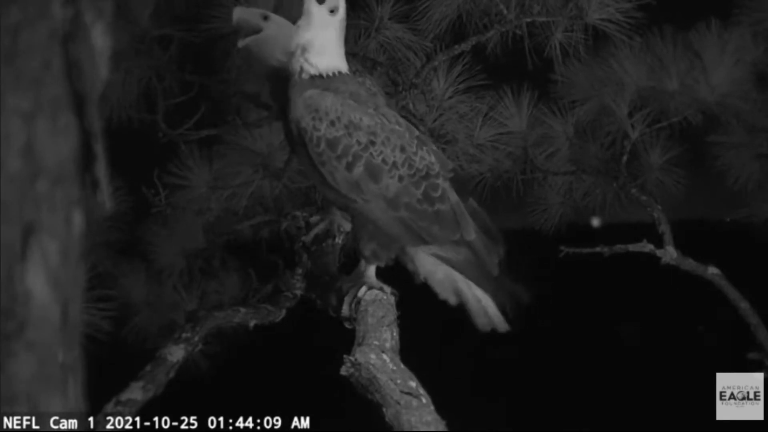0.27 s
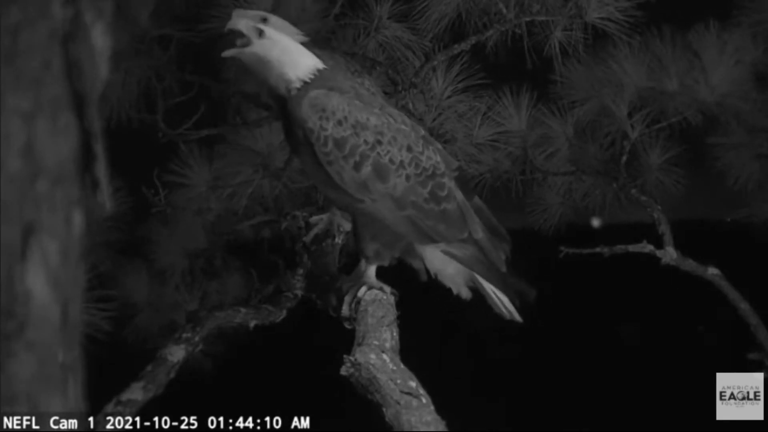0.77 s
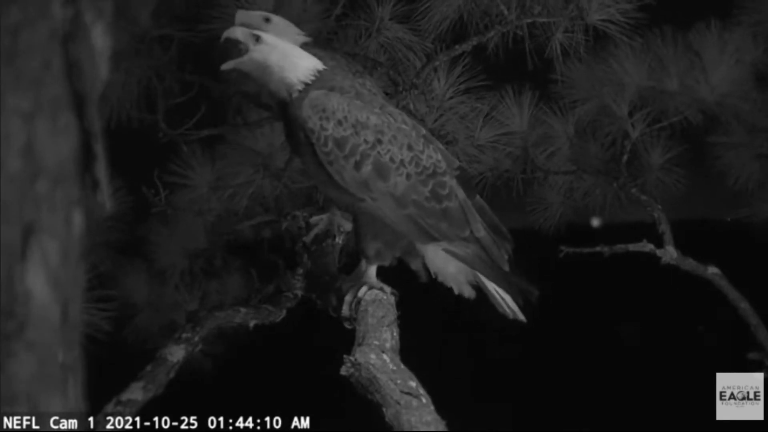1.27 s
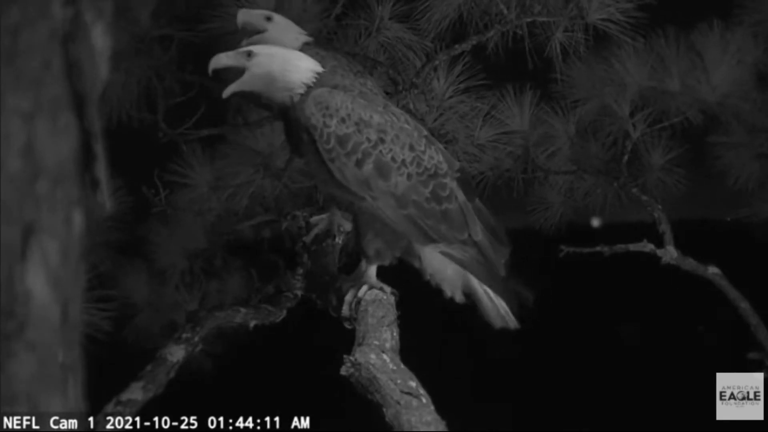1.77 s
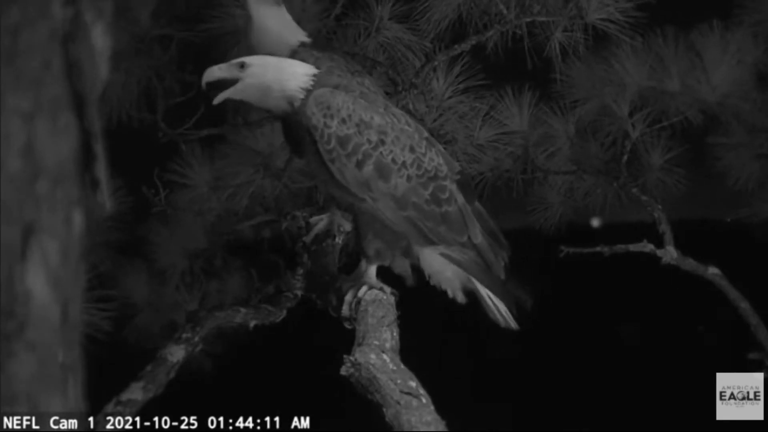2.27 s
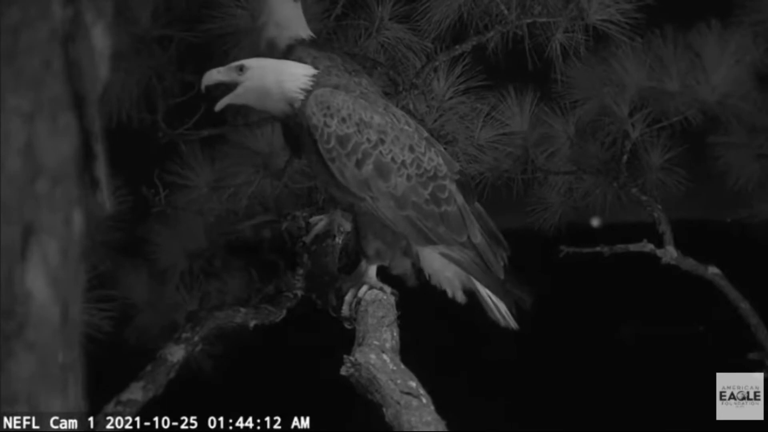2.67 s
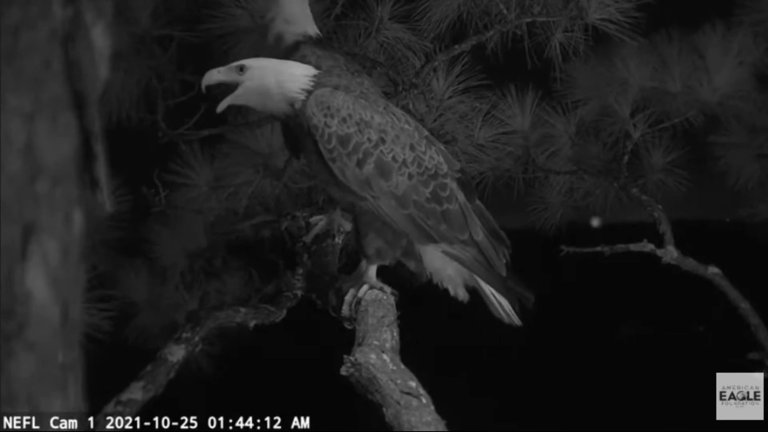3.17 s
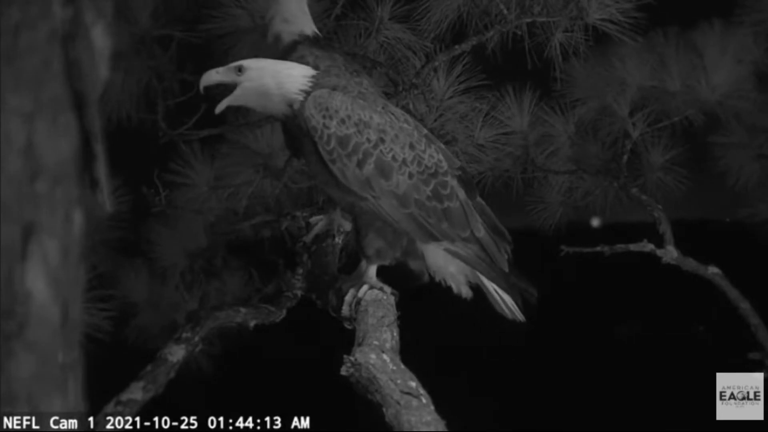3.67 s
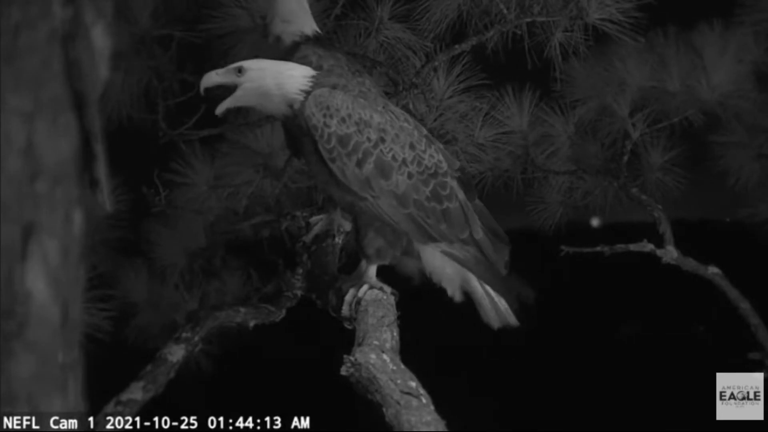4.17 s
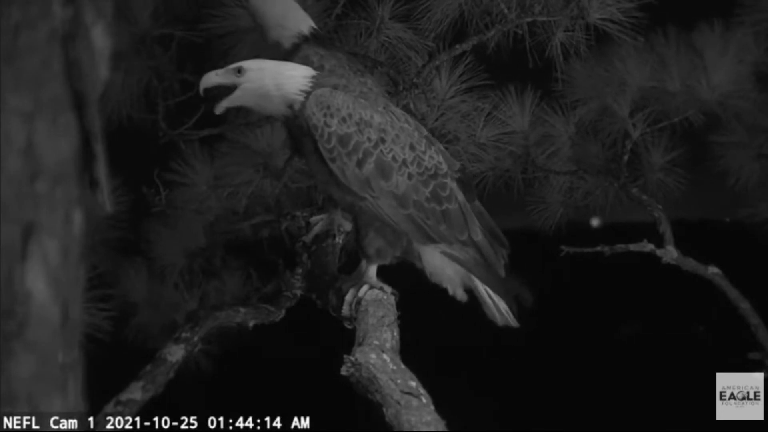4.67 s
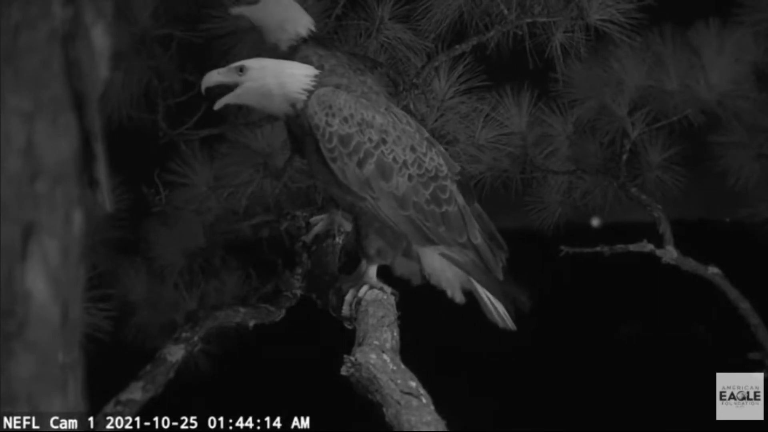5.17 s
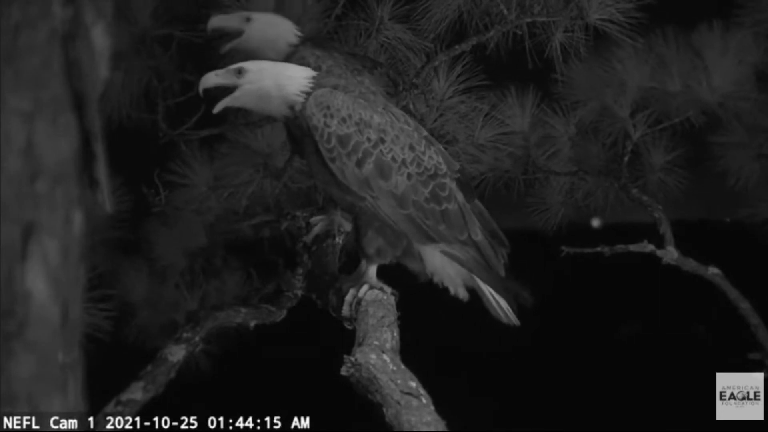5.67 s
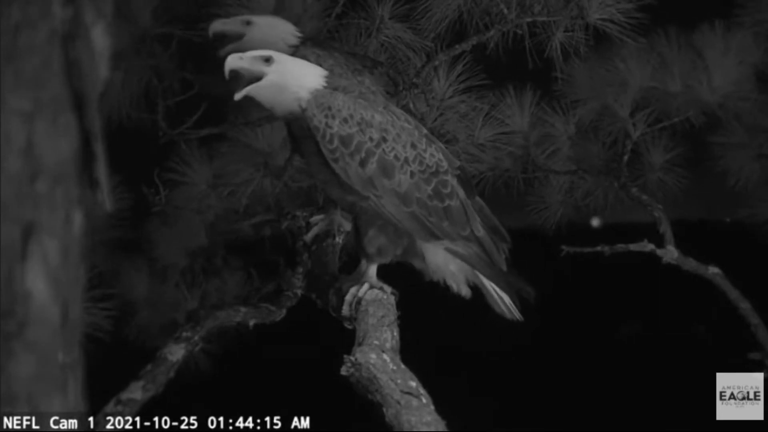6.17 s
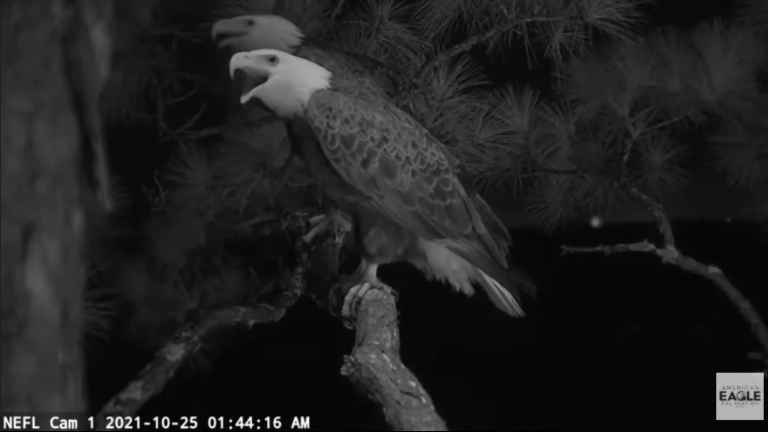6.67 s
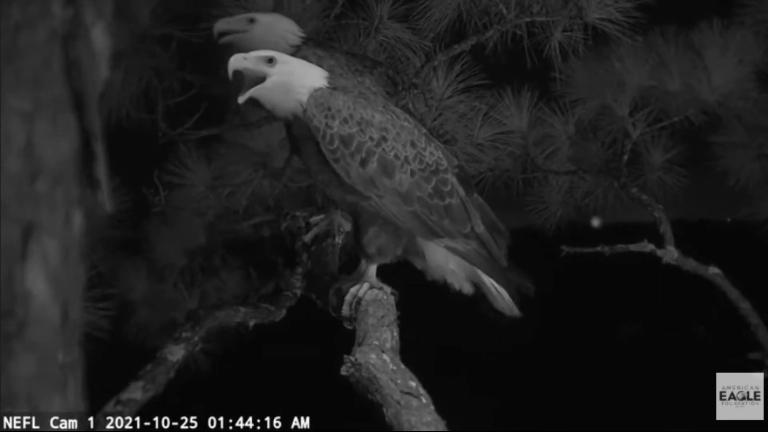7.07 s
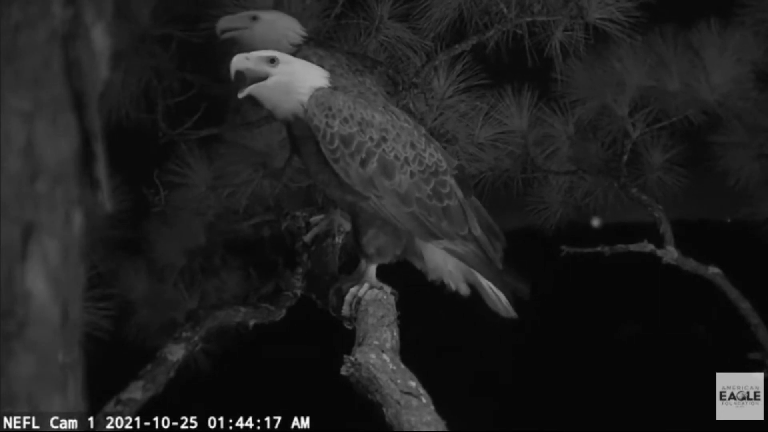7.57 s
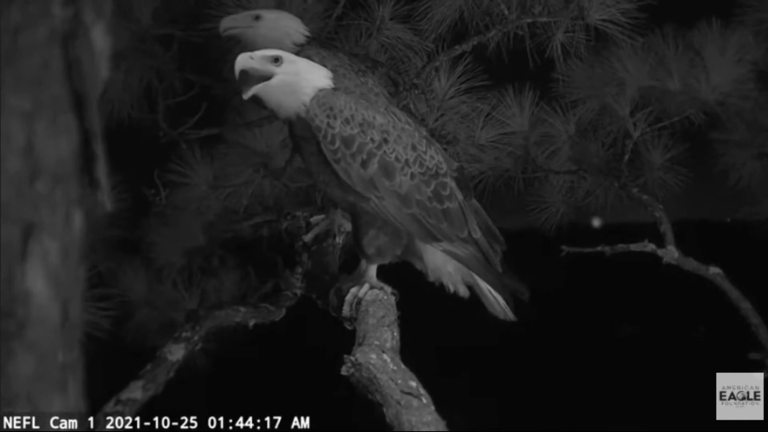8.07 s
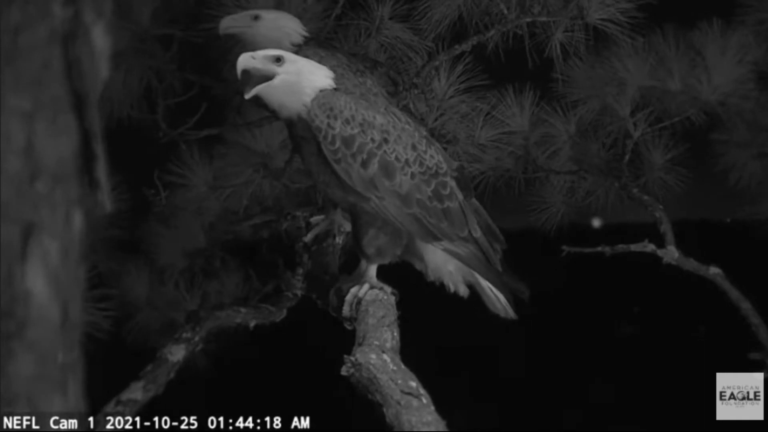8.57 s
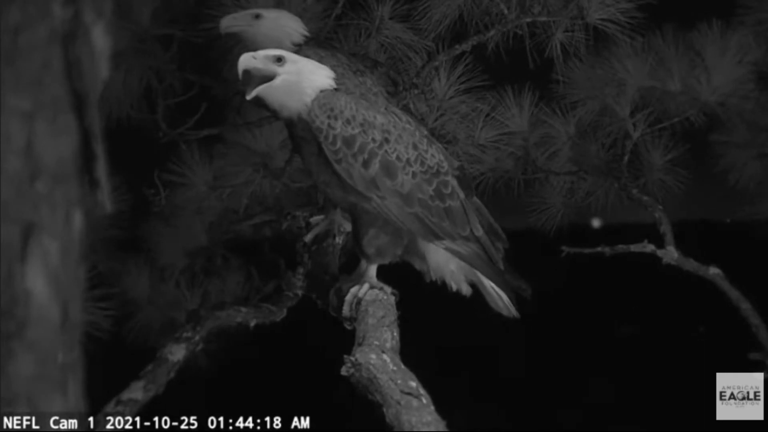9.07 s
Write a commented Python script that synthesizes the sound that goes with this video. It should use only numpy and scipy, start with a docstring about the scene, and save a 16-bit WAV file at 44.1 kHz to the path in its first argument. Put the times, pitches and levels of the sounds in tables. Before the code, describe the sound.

Two eagles call very close to the microphone on a quiet night. Shrill warbling chitters come first, then grunts snapping into yelps and squeaks, with two screams and rattling croaks between. Chitters return, giving way to short, steady reedy pipes, briefly hoarse, and two later chittering bouts. The loudest notes distort slightly; short echoes scatter from the trees over low air rumble and thin hiss.

```python
"""Two eagles call at night on a pine branch, so close to a nest camera that loud notes overload its microphone.
Over air rumble, camera hiss and whine, and a hum gone by 1.6 s, come thin whistles and shrill warbling chitters.
From 0.7 s grunts break into yelps and squeaks, with two screams and rattling croaks; chitters return at 2.5 s.
From 3.6 s steady reedy pipes sound, at first with a hoarse hiss; more chitters follow at 5.5 s and 8.1 s.
Notes are bent sine tones or pulses ringing in a throat; breath noise follows them and the trees echo them."""
import sys
import numpy as np
from scipy import signal
from scipy.fft import rfft, irfft
from scipy.io import wavfile

SR = 44100
rng = np.random.default_rng(int(sys.argv[2]) if len(sys.argv) > 2 else 0)


def transcribe(signal):
    """Save signal, clipped to [-1, 1], as a 16-bit WAV file at the path in sys.argv[1]."""
    frames = np.atleast_2d(signal).T
    limited = np.clip(frames, -1, 1)
    pcm = np.round(limited * 32767).astype(np.int16)
    wavfile.write(sys.argv[1], SR, pcm)


N = 411453

# Night air and camera hiss, the shape of each noise: pitch_hz, relative_level_db (per Hz)
AIR = [(12, -23), (22, -2), (105, -16.5), (271, -27.5), (686, -29.5), (1380, -36), (4500, -44),
       (6500, -100)]
HISS = [(3500, -32.5), (4700, -18), (5900, 0), (6300, -5), (6800, -17), (13300, -23), (14600, -61.5)]
AIR_DB, HISS_DB = -41, -54.5
# Steady camera whine: pitch_hz, level_db (rms)
WHINE = [(12970, -74.5)]
CUTOFF_HZ = 15400   # the camera cuts the sound above this

# Thin glides and ticks: start_s, length_s, start_pitch_hz, end_pitch_hz, level_db
GLIDES = [(0, 0.011, 4400, 3900, -29), (0.006, 0.042, 990, 1800, -31), (0.038, 0.014, 2480, 1300, -22),
          (1.651, 0.018, 3590, 2500, -17.5), (3.592, .036, 2700, 4070, -27),
          (3.662, 0.036, 5650, 5550, -24.5), (3.713, 0.0192, 3000, 6200, -29),
          (3.714, .022, 2650, 2950, -24), (3.838, .02, 4000, 3200, -30.5), (3.931, 0.042, 3900, 2700, -28),
          (4.368, 0.017, 4700, 2500, -26)]
# A spell in which the voice turns hoarse and hisses between the notes
HOARSE_START_S, HOARSE_END_S, HOARSE_DB = 3.62, 4.0, -44

# Turbulence in the open beak, the shape of its noise: pitch_hz, relative_level_db (per Hz)
RASP = [(200, 2.5), (1050, -16), (1450, 7), (1800, 1), (3200, -6), (6000, -30.5), (16000, -37)]
FOREST_LOW_HZ = 2000   # the needles scatter little below this

# Settings of every whistled note
WARBLE_HZ, WARBLE_WANDER, WARBLE_CREST_S = 54.2, .2, .005   # the first crest comes this soon after the start
NOTE_EDGE_S = .003   # extra time for a note to open
SHUDDER_HZ, SHUDDER_WANDER = 860, .1   # the second vibration in harsh notes
HARSH_HZ = 3624   # how often the random part of a harsh note's shudder changes, per second

# Chitters: the voice catches, may hold an upper register, then drops to the main squeal.
# start_s, squeal_hold_s, pitch_hz and level_db (before bend and swell), upper_s, upper_level_db (re the squeal)
CHITTERS = [(0.048, .048, 5760, -23.5, 0.00013, 0), (0.186, 0.019, 3582, -8, 0.044, -11.5),
            (0.34, 0.053, 3563, -6, 0, 0), (0.52, 0.042, 3500, -5.5, 0, 0),
            (2.624, 0.022, 3550, -14.5, 0.04, -3.5), (3.033, 0.055, 3458, -6, 0.00014, 0),
            (3.25, 0.048, 3417, -9, 0, 0), (3.472, 0.018, 3215, -21, 0, 0),
            (5.582, 0.015, 3534, -6, 0.048, -2), (5.727, .022, 3538, -4, 0.036, -3),
            (5.894, 0.042, 3569, -2, .015, -8.5), (6.077, 0.04, 3437, -4, 0.01, -14),
            (6.289, 0.04, 3360, -5.5, 0.00018, 0), (6.521, 0.022, 3256, -17, 0, 0),
            (8.32, 0.04, 3443, -4, 0.015, -13)]
# Squeals with a clean start: start_s, hold_s, pitch_hz and level_db (before bend and swell)
SQUEALS = [(0.097, 0.021, 4520, -23), (0.115, 0.0092, 3450, -16.5), (0.712, 0.0057, 3460, -11),
           (1.216, 0.0075, 2850, -14), (1.669, 0.0154, 3060, -9.5), (2.484, 0.063, 3630, -4),
           (2.785, 0.035, 4647, -19), (2.817, 0.023, 3673, -5.5), (3.487, 0.02, 2586, -13),
           (5.452, 0.062, 3569, -1.5), (6.536, 0.016, 2683, -19.5), (6.692, 0.016, 2093, -23),
           (8.12, 0.049, 3339, -4)]
# Bends are pitch ratios and swells are dB changes, each given at start, middle and end of a note
SQUEAL_BEND, SQUEAL_SWELL_DB = (0.96, 0.98, 0.94), (-4, 2, -2.5)   # over the hold
UPPER_RATIO, UPPER_BEND = 1.325, (.93, 0.97, 0.95)   # upper register: pitch re the squeal, and its bend
UPPER_OVERLAP_S = 0.0056   # both registers sound together for a moment
UPPER_HARSH = 0.27   # up there the voice is less steady
CATCH_S, CATCH_LEAD_S, CATCH_DB = 0.01257, 0.0075, -26.5
CHITTER_SWING_HZ = 144   # about how far the pitch warbles at first, in either register
SQUEAL_WARBLE = .018   # squeals without a catch, alone or beside other notes, swing less (share of pitch)
# The tail's longest length, its length limit per hold length, its fade, and how far it sinks (share of pitch)
RELEASE_S, RELEASE_PER_HOLD, RELEASE_FADE_DB, RELEASE_SAG = 0.025, 0.98, 29.5, 0.1

# Throat resonances of the grunts: pitch_hz, width_hz, relative_level_db
GRUNT_THROAT = [(1314, 66, 4.5), (1660, 220, 4), (2090, 108, 5.5), (2610, 230, -7), (3600, 180, -11.5)]
# Yelps: start_s, level_db (before swell), grunt_level_db, squeak_level_db (before swell), harshness (0 to 1)
YELPS = [(0.715, 1, -35.5, -8.5, 0.3), (1.118, -7, -14, -21.5, 0.13), (1.547, -6.5, -14.5, -26, 0),
         (1.984, -6, -16.5, -14.5, 0), (2.393, -6.5, -26, -27.5, 0), (2.783, -6, -16.5, -23.5, 0.08)]
# Soft grunts, alone or under a squeal or pipe: start_s, length_s, pitch_hz (mid-note), level_db
GRUNTS = [(0.99, 0.022, 675, -21.5), (4.88, 0.013, 638, -22.5), (6.315, 0.023, 773, -30),
          (6.519, 0.022, 762, -29), (6.689, 0.02, 706, -33.5), (6.82, 0.024, 669, -47),
          (8.108, 0.03, 721.5, -26.5)]
OPENING_GRUNT_S, OPENING_GRUNT_LEAD_S, OPENING_GRUNT_HZ = .025, .019, 626.4
GRUNT_BEND = 0.26   # pitch rise over an opening grunt, as a share
YELP_S, YELP_HZ, YELP_BEND, YELP_SWELL_DB = .033, 2428, (.905, 0.95, 1.03), (-4.5, 0, -6.5)
YELP_HZ_PER_DB, YELP_USUAL_DB = 18.5, -9   # a harder yelp is higher
OCTAVE_DB, OCTAVE_GAIN_DB = -21.5, 10.5   # second harmonic at yelp pitch; its gain per octave lower
SQUEAK_S, SQUEAK_HZ = 0.016, 3090

# A long scream and a short one, a curve each: time_s, pitch_hz (before warble), level_db
SCREAMS = [
    [(0.741, 3133, 3), (0.786, 3032, -6), (0.792, 3020, -23), (0.798, 2904, -1.5), (0.829, 2837, -3),
     (0.849, 2888, 0.5), (0.873, 3007, -3), (0.902, 3170, -12.5), (0.921, 3240, -27.5)],
    [(1.227, 2887, -3.5), (1.261, 2965, -4), (1.285, 2930, -33)],
]
# The voice steadies as it goes: time_s, warble (share of pitch)
SCREAM_WARBLE = [(0.8, 0.021), (0.84, 0.0057)]

# Croaks, in rattling runs after the yelps: start_s, length_s, level_db, chest_level_db (added to the chest)
CROAKS = [(0.932, 0.0077, -27.5, -1.5), (1.284, 0.012, -32.5, -11.5), (1.597, 0.0045, -25, 0.5),
          (1.631, 0.0076, -30, 5), (1.701, 0.0053, -21.5, 5.5), (2.032, 0.0054, -18, -1),
          (2.052, 0.011, -24, 3.5), (2.072, 0.01, -29, 0), (2.115, 0.0092, -19.5, -1),
          (2.133, 0.011, -24.5, 11.5), (2.447, 0.0077, -13.5, -1), (2.469, 0.01, -17.5, -0.5),
          (2.514, 0.0087, -16, 4.5), (2.53, 0.019, -21.5, 4.5), (2.84, 0.0082, -20, -1.5),
          (2.862, 0.0071, -15, 2), (2.878, 0.02, -16, -1), (2.905, 0.0085, -23.5, 6.5),
          (3.811, 0.0077, -14, 1)]
# Throat and chest resonances of the croaks: pitch_hz, width_hz, relative_level_db
CROAK_THROAT = [(1478, 56, 7.5), (1974, 1100, -11)]
CROAK_CHEST = [(462, 900, -15), (868, 150, -7.5)]
# Throat resonances of the crackle: pitch_hz, width_hz, relative_level_db
CRACKLE_THROAT = [(1430, 53, 2), (2000, 300, -6.5), (3160, 230, -2.5)]
CROAK_HZ, CROAK_BEND = 467.4, -0.25   # usual pulse rate and its change over a croak, as a share
CROAK_SPREAD = .05   # scales how pulse rate and resonances differ between croaks
CRACKLE_PER_S, CRACKLE_DB, CRACKLE_SPILL_S = 380, -34, 0.038   # gritty crackle around each rattle
CRACKLE_PUFF_S = .0012   # how quickly each puff of air dies away

# Steady, reedy pipes, some led in by a falling whistle:
# start_s, length_s, pitch_hz and level_db (before bend and swell), whistle_length_s, harshness (0 to 1)
PIPES = [(3.586, 0.019, 1390, -15, 0.0027, 0.04), (3.617, 0.054, 2421, -10.5, 0.00088, 0.06),
         (3.696, 0.019, 2978, -6, 0.016, 0.12), (3.774, 0.018, 3225, -7, 0.019, 0.3),
         (3.895, 0.019, 3097, -6.5, .013, 0.3), (3.919, 0.014, 2620, -2, 0, 0.03),
         (4.04, 0.047, 2515, 0, 0.018, 0.04), (4.2, 0.045, 2419, -2, 0.019, 0.02),
         (4.387, 0.02, 1537, -15, 0, 0.03), (4.395, 0.014, 2323, -7, 0.0017, 0.15),
         (4.421, 0.014, 2237, -23.5, 0.0027, 0.2), (4.585, 0.021, 1437, -1, 0, 0.03),
         (4.881, 0.021, 1283, -13, 0, 0)]
PIPE_BEND, PIPE_SWELL_DB = (0.97, 0.99, 0.93), (0, -0.5, -8.5)
SLUR_BEND, SLUR_DB, SLUR_UNDERTONE_DB = (1.98, 1.68, 1.4), -26, -2   # bend is re the pipe's pitch
SCOOP, SCOOP_S = 0.16, 0.0023   # after such a fall the pipe scoops up from this share below its pitch


def from_db(db):
    """Turn decibels into a plain multiplier."""
    return 10 ** (np.asarray(db) / 20)


def rms_one(x):
    """Scale a sound to an average (rms) strength of 1."""
    return x / np.sqrt(np.mean(x ** 2) + 1e-20)


def add(out, s, sound):
    """Mix a sound in at time s."""
    at = max(0, round(s * SR))
    out[at:at + len(sound)] += sound[:max(0, N - at)]


def progress(length):
    """Run from 0 to 1 over a note."""
    return np.linspace(0, 1, max(64, round(length * SR)))


def arch(u, start, middle, end):
    """Draw a parabola through three values."""
    return start * (1 - u) * (1 - 2 * u) + middle * (2 * u) * (2 - 2 * u) + end * u * (2 * u - 1)


def fades(u, edge_s):
    """Open and close a note smoothly."""
    nearest_end_s = np.minimum(u, 1 - u) * len(u) / SR
    return np.sin(np.pi / 2 * np.clip(nearest_end_s / edge_s, 0, 1)) ** 2


def flutter(u, rate):
    """Waver randomly around 0 with a typical size of 1, drawing new values at this rate per second."""
    return np.interp(np.arange(len(u)) * rate / SR, np.arange(1024), rng.standard_normal(1024))


def turns(hz):
    """Add up a moving pitch into a phase."""
    return 2 * np.pi * np.cumsum(hz) / SR


def coloured_noise(spectrum):
    """Shape random noise to a spectrum, with rms 1."""
    hz, db = np.transpose(spectrum)
    bins = np.maximum(np.fft.rfftfreq(N, 1 / SR), 1)
    gain = from_db(np.interp(np.log(bins), np.log(hz), db))
    return rms_one(irfft(rfft(rng.standard_normal(N)) * gain, N))


def night():
    """Air rumble, a far hum that dies away early, and the hiss and whine of the camera."""
    t = np.arange(N) / SR
    air = from_db(AIR_DB) * coloured_noise(AIR)
    hiss = from_db(HISS_DB) * coloured_noise(HISS)
    whine = sum(np.sqrt(2) * from_db(db) * np.sin(2 * np.pi * hz * t) for hz, db in WHINE)
    hum_fade = np.interp(t, [1.35, 1.6], [1, 0])
    hum = from_db(-51) * np.sin(2 * np.pi * 364 * t) * hum_fade
    return air + hiss + whine + hum


def wheezes():
    """Thin whistles and ticks that slip out between the notes, and a spell of hoarse hiss."""
    out = np.zeros(N)
    for s, length, start_hz, end_hz, db in GLIDES:
        u = progress(length)
        hz = (start_hz + (end_hz - start_hz) * u) * (1 + .035 * flutter(u, 1500))
        add(out, s, from_db(db) * np.sin(turns(hz)) * fades(u, length / 2))
    u = progress(HOARSE_END_S - HOARSE_START_S)
    band = signal.butter(2, [1700, 5200], "band", fs=SR, output="sos")
    hiss = rms_one(signal.sosfiltfilt(band, rng.standard_normal(len(u))))
    uneven_level = from_db(HOARSE_DB + 5 * flutter(u, 120))
    add(out, HOARSE_START_S, uneven_level * hiss * fades(u, .1))
    return out


def rasp(voice, rasp_db, linger_s):
    """Turbulent breath noise follows the effort of the voice and lingers a moment."""
    r = np.exp(-1 / (linger_s * SR))
    effort = signal.lfilter([1 - r], [1, -r], np.abs(voice) ** 0.38 + 1e-12)
    return from_db(rasp_db) * effort * coloured_noise(RASP)


def scatter(x, t60, delay_s, dull_hz):
    """Dense echoes from trunks and needles, dull and dying away by 60 dB in t60 seconds."""
    t = np.arange(2 * SR) / SR
    build_up = 1 - np.exp(-t / delay_s)
    echoes = rng.standard_normal(len(t)) * from_db(-60 * t / t60) * build_up
    dull = signal.butter(2, min(dull_hz, .45 * SR), fs=SR, output="sos")
    dull_echoes = signal.sosfilt(dull, echoes / np.linalg.norm(echoes))
    return signal.fftconvolve(x, dull_echoes)[:N]


def whistle(hz, db, warble, second_db, third_db, jitter, choke_db, rough):
    """A near-sine note whose pitch zigzags; it chokes and roughens at the bottom of each swing."""
    u = np.linspace(0, 1, len(hz))
    warble_phase = turns(WARBLE_HZ * (1 + WARBLE_WANDER * flutter(u, 73))) / 2
    crest = np.cos(warble_phase - np.pi * WARBLE_HZ * (NOTE_EDGE_S + WARBLE_CREST_S)) ** 2
    trough = np.tanh(warble / .025) * (1 - crest) ** 4
    swing = np.tanh(1.6 * (2 * crest - 1)) + jitter * flutter(u, 900)
    phase = turns(hz * (1 + warble * swing * (1 - u ** 2 / 2)))   # the swing narrows as the note gives out
    level = from_db(db - choke_db * (trough - trough.mean()))
    # the syrinx (the bird's voice box) also takes a moment to settle
    grain = 1 + rough * (trough + (1 - u) ** 6) * flutter(u, 2200)
    overtones = from_db(second_db) * np.sin(2 * phase) + from_db(third_db) * np.sin(3 * phase)
    tone = np.sin(phase) + overtones
    return tone * level * grain * fades(u, .007)


def contour(length, hz, db, bend, swell_db):
    """Pitch and level of a note, each an arch."""
    u = progress(length + 2 * NOTE_EDGE_S)
    return hz * arch(u, *bend), db + arch(u, *swell_db)


def pure(hz, db, warble):
    """The shrill, warbling voice: a whistle with weak overtones."""
    return whistle(hz, db, warble, second_db=-28.5, third_db=-41.0, jitter=0.36, choke_db=9, rough=0.26)


def shudder(tone, depth):
    """An unsteady second vibration of the syrinx adds side tones to a note, the lower one stronger."""
    slow = turns(SHUDDER_HZ * (1 + SHUDDER_WANDER * flutter(tone, 500)))
    lower = np.real(signal.hilbert(tone) * np.exp(-1j * slow))
    return tone + depth / 2 * (lower + tone * (np.cos(slow) + flutter(tone, HARSH_HZ)))


def squeal(hold_s, hz, db, warble):
    """A shrill note: an arched hold, then a tail that sinks and fades."""
    release_s = min(RELEASE_S, RELEASE_PER_HOLD * hold_s)
    t = np.arange(-NOTE_EDGE_S, hold_s + release_s, 1 / SR)
    held = np.clip(t / hold_s, 0, 1)
    let_go = np.clip((t - hold_s) / release_s, 0, 1)
    pitch = hz * (arch(held, *SQUEAL_BEND) - RELEASE_SAG * let_go)
    level_db = db + arch(held, *SQUEAL_SWELL_DB) - RELEASE_FADE_DB * let_go
    return pure(pitch, level_db, warble)


def catch(start_hz, end_hz, shake_hz, jitter):
    """The pitch shoots upward while a slower second vibration shakes the loudness."""
    u = progress(CATCH_S)
    hz = (start_hz + (end_hz - start_hz) * u) * (1 + jitter * flutter(u, 2500))
    shake = 1 + 0.53 * np.sin(turns(shake_hz * (1 + 0.11 * flutter(u, 347))))
    return rms_one(np.sin(turns(hz)) * shake * (u + 0.27) * fades(u, 0.0018))


def chitters():
    """Catch, sometimes a rough upper register, and squeal in one go; other squeals have no catch."""
    out = np.zeros(N)
    for s, hold_s, hz, db, upper_s, upper_db in CHITTERS:
        caught = catch(start_hz=1009, end_hz=3040, shake_hz=766.4, jitter=0.18)
        add(out, s - CATCH_LEAD_S, from_db(CATCH_DB) * caught)
        if upper_s > NOTE_EDGE_S:
            upper_hz = hz * UPPER_RATIO
            pitch, level_db = contour(upper_s + UPPER_OVERLAP_S, upper_hz, db + upper_db,
                                      UPPER_BEND, swell_db=(-3, 0, -1.5))
            upper = pure(pitch, level_db, CHITTER_SWING_HZ / upper_hz)
            add(out, s - NOTE_EDGE_S, shudder(upper, UPPER_HARSH))
        add(out, s + upper_s - NOTE_EDGE_S, squeal(hold_s, hz, db, CHITTER_SWING_HZ / hz))
    for s, *note in SQUEALS:
        add(out, s - NOTE_EDGE_S, squeal(*note, SQUEAL_WARBLE))
    return out


def throat(x, resonances):
    """Let a sound ring in parallel resonances with alternating signs."""
    out = 0
    for k, (hz, width, db) in enumerate(resonances):
        r = np.exp(-np.pi * width / SR)   # a narrower resonance rings longer
        feedback = [1, -2 * r * np.cos(2 * np.pi * hz / SR), r * r]
        ringing = signal.lfilter([1, 0, -1], feedback, x)
        out = out + (-1) ** k * from_db(db) * (1 - r * r) / 2 * ringing
    return out


def pulsed(length, hz, rise, resonances, jitter):
    """A burst of syrinx pulses that swells, fades and rings in the throat."""
    u = progress(length)
    cycles = turns(hz * (1 + rise * (u - .5) + jitter * flutter(u, 700))) / (2 * np.pi)
    pulses = np.diff(np.floor(cycles), prepend=0) * fades(u, length / 2)   # one click per cycle
    sound = throat(np.pad(pulses, (0, SR // 40)), resonances)
    # the membranes close softly
    sound = signal.sosfilt(signal.butter(2, 4000, fs=SR, output="sos"), sound)
    return sound / np.sqrt(np.sum(sound ** 2) / len(u) + 1e-12)


def grunts():
    """Slow pulsing of the syrinx: rising into each yelp, otherwise sinking a little."""
    out = np.zeros(N)
    for s, _, db, *_ in YELPS:
        grunt = pulsed(OPENING_GRUNT_S, OPENING_GRUNT_HZ, GRUNT_BEND, GRUNT_THROAT, jitter=0.045)
        add(out, s - OPENING_GRUNT_LEAD_S, from_db(db) * grunt)
    for s, length, hz, db in GRUNTS:
        grunt = pulsed(length, hz, rise=-0.16, resonances=GRUNT_THROAT, jitter=0.017)
        add(out, s, from_db(db) * grunt)
    return out


def reedy(hz, db, harsh):
    """The lower, steadier voice, richer in its octave the lower it goes; when harsh it shudders."""
    second_db = OCTAVE_DB + OCTAVE_GAIN_DB * np.log2(YELP_HZ / hz.mean())
    tone = whistle(hz, db, warble=0.007, second_db=second_db, third_db=-33,
                   jitter=.6, choke_db=3, rough=0.12)
    return shudder(tone, harsh)


def yelps():
    """Rising reedy notes that flip into a short squeak."""
    out = np.zeros(N)
    for s, db, _, squeak_db, harsh in YELPS:
        hz = YELP_HZ + YELP_HZ_PER_DB * (db - YELP_USUAL_DB)
        pitch, level_db = contour(YELP_S, hz, db, YELP_BEND, YELP_SWELL_DB)
        add(out, s - NOTE_EDGE_S, reedy(pitch, level_db, harsh))
        add(out, s + YELP_S, squeal(SQUEAK_S, SQUEAK_HZ, squeak_db, warble=0.0085))
    return out


def scream():
    """Held shrill notes: the first dips in pitch and steadies; both rise before they fade."""
    out = np.zeros(N)
    warble_s, warble_share = np.transpose(SCREAM_WARBLE)
    for curve in SCREAMS:
        s, hz, db = np.transpose(curve)
        t = np.arange(s[0], s[-1], 1 / SR)
        warble = np.interp(t, warble_s, warble_share)
        add(out, s[0], pure(np.interp(t, s, hz), np.interp(t, s, db), warble))
    return out


def rattles():
    """Short croaks of a few slowing pulses each, wrapped in fine crackle."""
    out, active = np.zeros(N), np.zeros(N)
    for s, length, db, chest_db in CROAKS:
        chest = [(hz, width, level_db + chest_db) for hz, width, level_db in CROAK_CHEST]
        throat_shift, pitch = 1 + CROAK_SPREAD * rng.uniform(-1.5, 1, 2)
        resonances = np.array(chest + CROAK_THROAT) * [throat_shift, 1, 1]
        croak = pulsed(length, CROAK_HZ * pitch, CROAK_BEND, resonances, jitter=.04)
        add(out, s, from_db(db) * croak)
        around = fades(progress(length + 2 * CRACKLE_SPILL_S), CRACKLE_SPILL_S)
        add(active, s - CRACKLE_SPILL_S, around)
    clicks = (rng.random(N) < CRACKLE_PER_S / SR) * rng.standard_normal(N)
    # each click becomes a tiny burst of air
    decay = np.exp(-1 / (CRACKLE_PUFF_S * SR))
    puffs = signal.lfilter([1], [1, -decay], clicks + 1e-18) * rng.standard_normal(N)
    soften = signal.butter(4, 4000, fs=SR, output="sos")
    crackle = signal.sosfilt(soften, throat(puffs, CRACKLE_THROAT))
    return out + from_db(CRACKLE_DB) * np.minimum(active, 1) * rms_one(crackle)


def slur(length, hz, waver):
    """A faint, unsteady downward glide with undertones at a third and two thirds of its pitch."""
    u = progress(length + NOTE_EDGE_S)
    phase = turns(hz * arch(u, *SLUR_BEND) * (1 + waver * flutter(u, 1204)))
    undertones = np.sin(phase / 3) + np.sin(2 * phase / 3) / 2
    return from_db(SLUR_DB) * (np.sin(phase) + from_db(SLUR_UNDERTONE_DB) * undertones) * fades(u, 0.011)


def pipes():
    """Nearly level reedy notes; a whistle may fall into them from about an octave above."""
    out = np.zeros(N)
    for s, length, hz, db, slur_s, harsh in PIPES:
        pitch, level_db = contour(length, hz, db, PIPE_BEND, PIPE_SWELL_DB)
        if slur_s > NOTE_EDGE_S:
            add(out, s - slur_s, slur(slur_s, hz, waver=0.0184))
            since_start_s = np.maximum(np.arange(len(pitch)) / SR - NOTE_EDGE_S, 0)
            pitch = pitch * (1 - SCOOP * np.exp(-since_start_s / SCOOP_S))
        add(out, s - NOTE_EDGE_S, reedy(pitch, level_db, harsh))
    return out


def scene():
    """The birds' voices with their breath noise, the echoes and the background."""
    shrill = chitters() + scream() + wheezes()
    low = yelps() + pipes()
    rough = grunts() + rattles()
    voice = shrill + rasp(shrill, rasp_db=-34.5, linger_s=0.0022)
    voice = voice + low + rasp(low, rasp_db=-35.0, linger_s=0.0023)
    voice = voice + rough + rasp(rough, rasp_db=-26, linger_s=0.012)
    branches = from_db(-9) * scatter(voice, t60=0.04, delay_s=0.001, dull_hz=5000)
    carried = signal.sosfilt(signal.butter(1, FOREST_LOW_HZ, "high", fs=SR, output="sos"), voice)
    forest = from_db(-29.0) * scatter(carried, t60=1.0, delay_s=0.038, dull_hz=3900)
    return (voice + branches + forest + night())[None]


def record(dry):
    """The microphone's input stage clips loud notes; the top of the range is cut."""
    fine = signal.resample_poly(dry, 2, 1, axis=-1)   # clip at twice the sample rate
    clipped = fine / (1 + np.abs(fine / .55) ** 10) ** (1 / 10)   # bends over towards a limit of 0.55
    sound = signal.resample_poly(clipped, 1, 2, axis=-1)
    return signal.sosfiltfilt(signal.butter(12, CUTOFF_HZ, fs=SR, output="sos"), sound)


dry = scene()
out = record(dry)
transcribe(out)
```